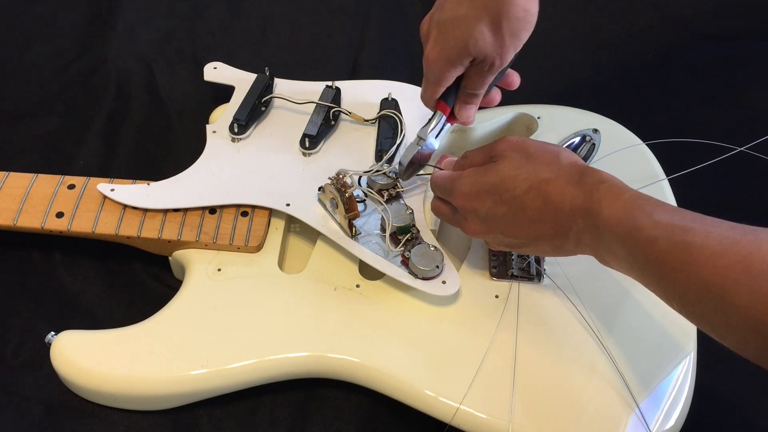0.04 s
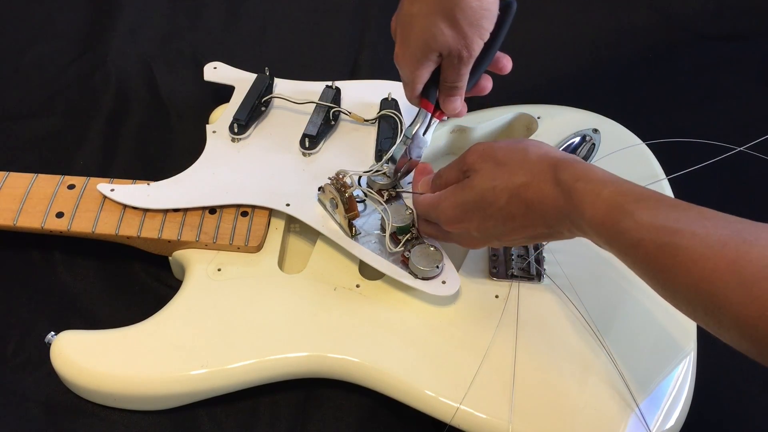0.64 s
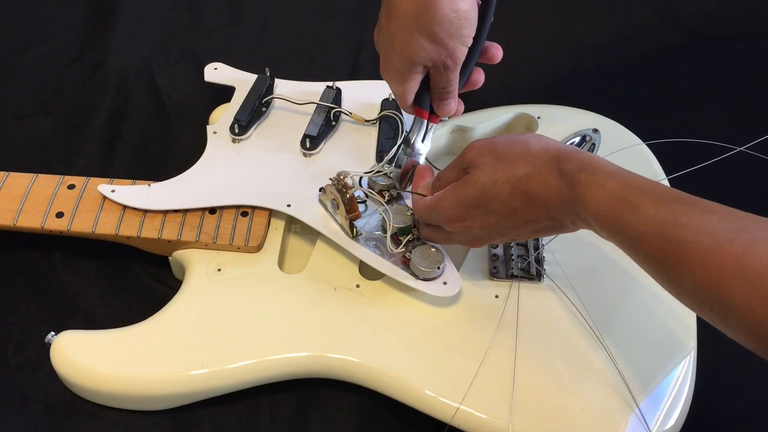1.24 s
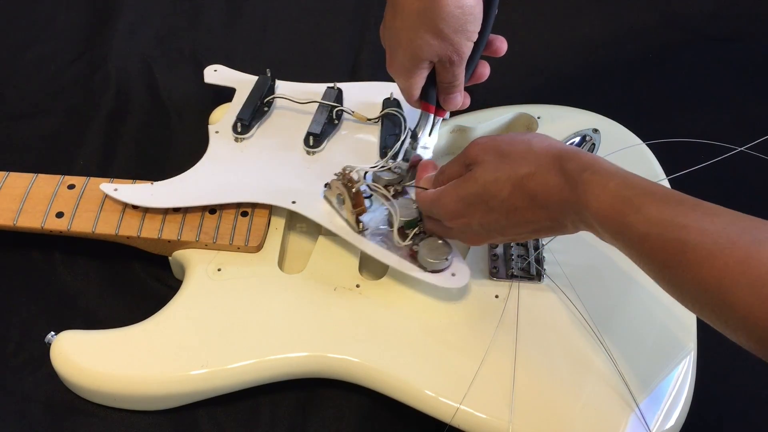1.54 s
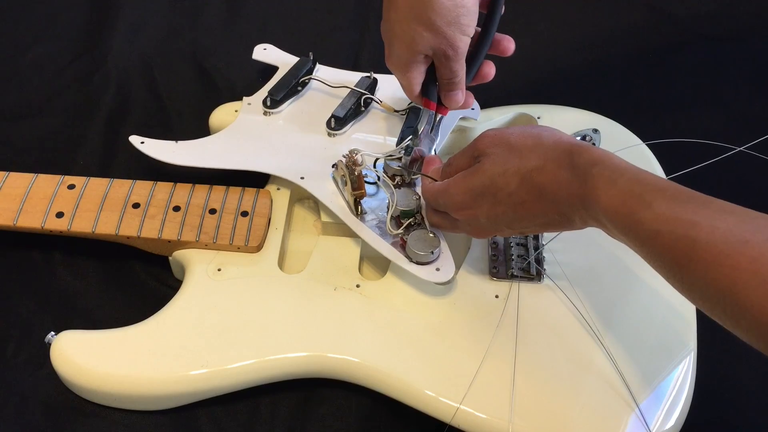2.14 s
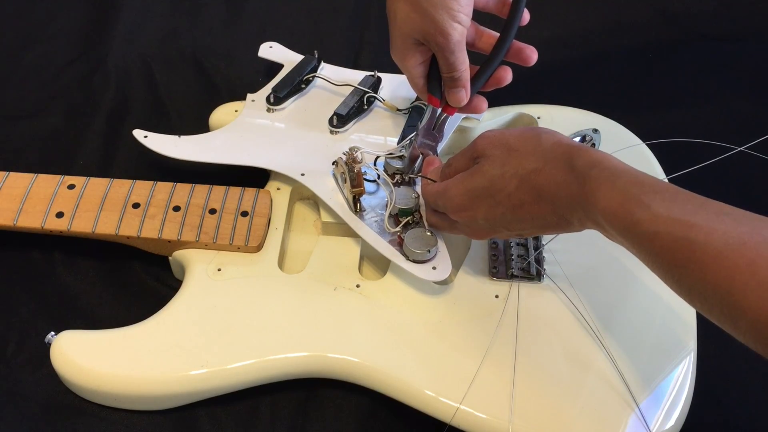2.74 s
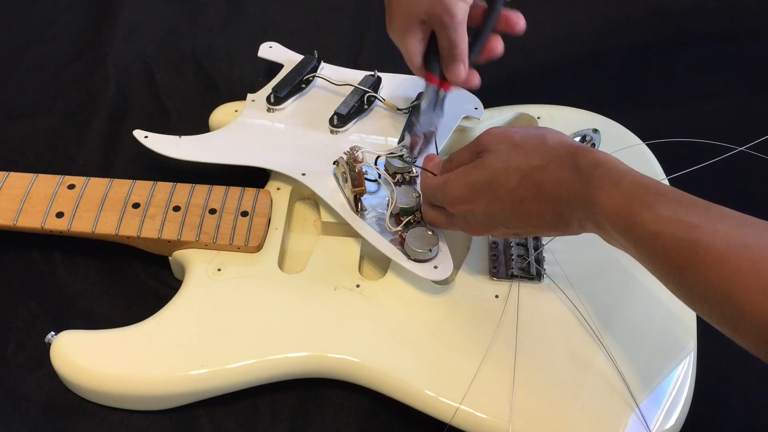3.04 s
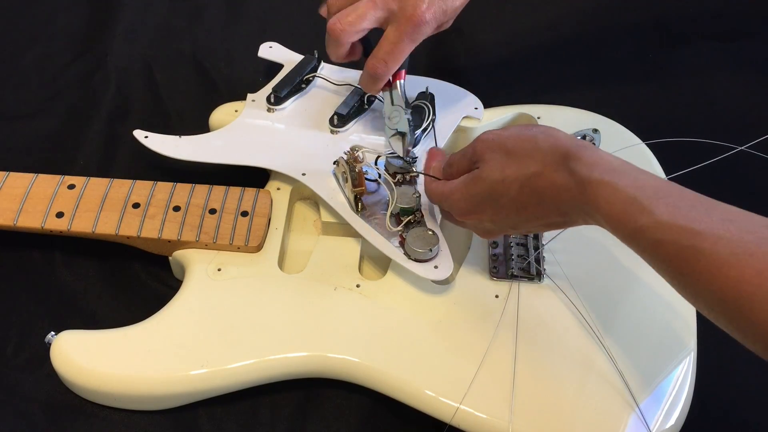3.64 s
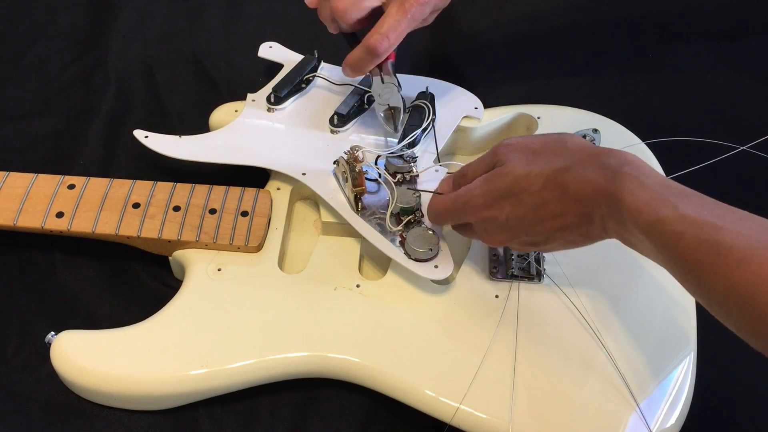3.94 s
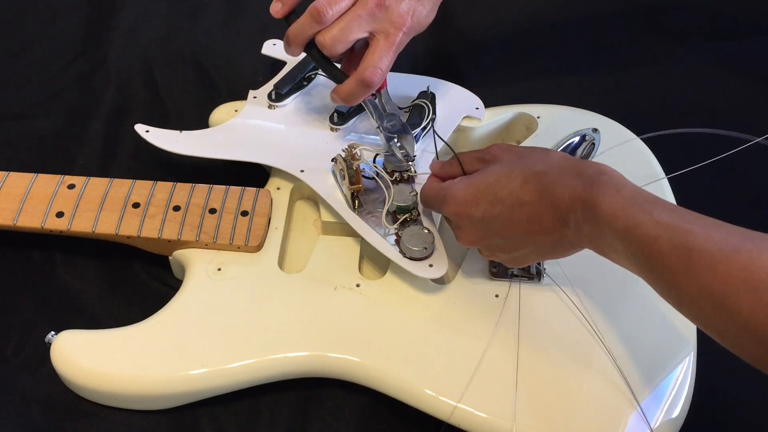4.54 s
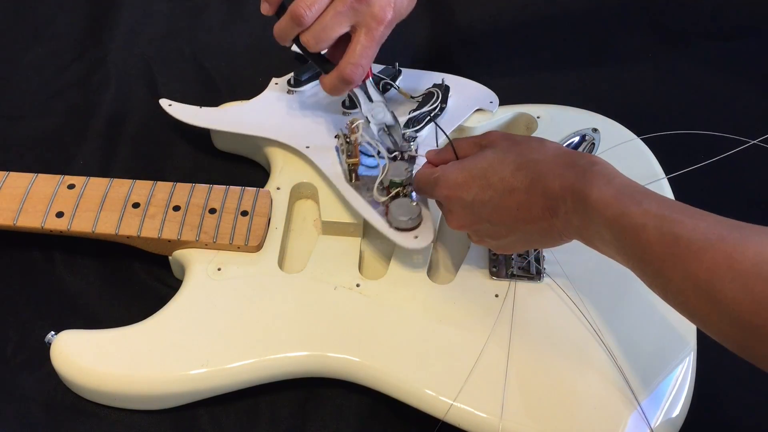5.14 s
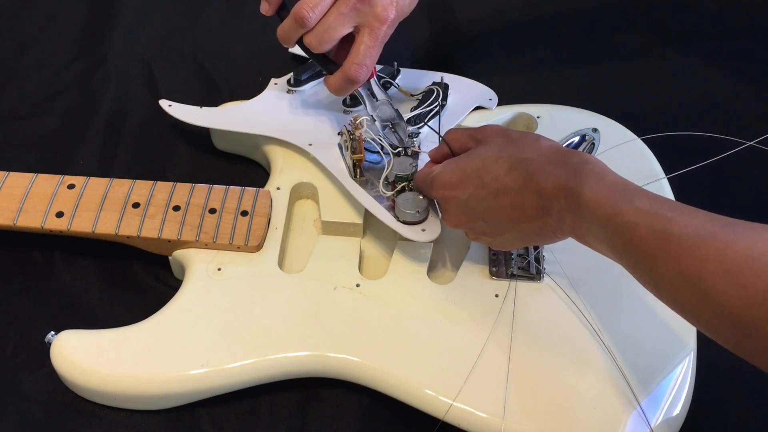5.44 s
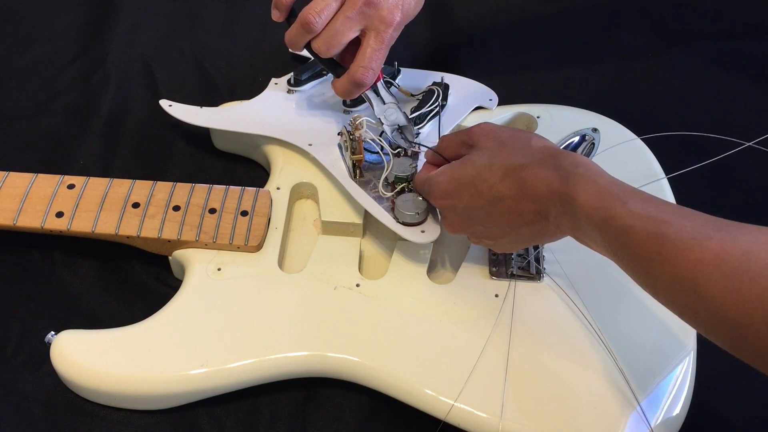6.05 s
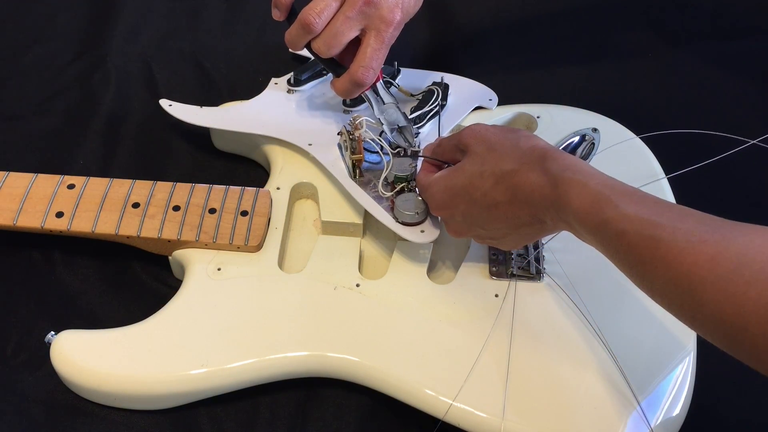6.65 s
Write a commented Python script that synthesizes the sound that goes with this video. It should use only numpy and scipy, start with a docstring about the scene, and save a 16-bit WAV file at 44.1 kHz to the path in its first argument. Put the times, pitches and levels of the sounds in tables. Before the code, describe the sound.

Steel pliers tick faintly on small metal parts, and wire gives tiny squeaks in their grip. A loose plastic plate then knocks and rubs on a wooden guitar body, leaving a faint metallic ring and a soft low boom. Sparse clicks and scrapes follow, until plate and pliers clatter together, louder, before a few last ticks. A close microphone in a small, quiet room picks up low hum and hiss.

```python
"""Pliers on the wiring under a loose electric-guitar pickguard; one close microphone, small quiet room.
First the steel jaws tick on pots and lugs, and wire squeaks in their grip. From 1.6 s the plastic plate
knocks and rubs on the wooden body, and a jolt sets the metalwork ringing and the bench booming faintly.
Sparse clicks and scrapes follow. Near 5 s plate and pliers clatter together with a second jolt,
then a few last ticks. A faint low hum and microphone hiss lie underneath throughout."""
import sys
import numpy as np
from scipy import signal
from scipy.fft import rfft, irfft, next_fast_len
from scipy.io import wavfile
from scipy.ndimage import uniform_filter1d

SR = 44100
rng = np.random.default_rng(int(sys.argv[2]) if len(sys.argv) > 2 else 0)


def pcm_store(signal):
    """Save signal as 16-bit PCM."""
    levels = np.round(np.clip(np.atleast_2d(signal), -1, 1) * 32767)
    wavfile.write(sys.argv[1], SR, levels.astype(np.int16).T)


N = 298996

# Modes of the pickguard with its pots and pickups: f/Hz, level/dB, t60/s
PLATE_MODES = [(265, -12.5, 0.17), (311.4, -4, 0.13), (432.3, -9.5, 0.12), (495.5, -3, 0.1),
               (563.7, -3, 0.1), (657.8, -2, 0.13), (731, -20, 0.2), (916, -1.5, 0.027), (1052, -1, 0.06),
               (1083, 0, 0.068), (1305, -11.5, 0.07), (1517, -1, 0.032), (1605, -4.5, 0.029),
               (1737, -5, 0.033), (2030, -34, 0.018), (2530, -6.5, 0.024), (2815, -21, 0.057)]
# Spectrum of the dull crack of plastic on wood: f/Hz, level/dB
PLATE_CRACK = [(100, -21), (200, -9), (290, 1.5), (680, 7.5), (810, -7), (1000, 3), (1300, -19), (1700, -5),
               (2100, -5.5), (2600, 1), (3800, -12), (8000, -0.5), (15000, -11)]
# Plate against body: t/s, contact/s, ring of the touching spot f/Hz, lowest free vibration f/Hz,
# level/dB, strongest f/Hz, treble roll-off/(dB per octave)
PLATE_KNOCKS = [(1.612, 0.0035, 706, 200, -52.5, 850, 10.5), (1.6955, .002, 650, 190, -43, 600, 8.5),
                (1.7614, 0.00033, 570, 170, -30, 650, 13), (1.861, 0.002, 499, 170, -27.5, 720, 11.5),
                (1.9881, 0.0011, 1064, 180, -35, 900, 11.5), (2.293, 0.00034, 1950, 200, -44, 1700, 17.5),
                (2.4229, .0007, 1044, 200, -44.5, 1150, 15), (2.6468, .013, 690, 220, -48.5, 1000, 7.5),
                (4.8268, .0007, 960, 220, -42.5, 1000, 10.5), (4.9803, 0.0012, 1370, 300, -37.5, 1400, 2),
                (4.9865, 0.00043, 496, 330, -34, 850, 6.5), (4.996, .0009, 545, 350, -35.5, 450, 9),
                (5.031, 0.002, 500, 520, -35.5, 470, 7.5), (5.3079, 0.0054, 1210, 300, -39.5, 1050, 17)]

def pickguard():
    """The plate drops on the body: a soft crack and a hollow ring; a slower contact smears the attack."""
    out, t = np.zeros(N), np.arange(SR // 2) / SR
    for s, contact, spot_hz, lowest_hz, db, centre_hz, roll_off in PLATE_KNOCKS:
        crack = amp(11 - 60 * t / (0.0096 + 2 * contact)) * shaped_noise(PLATE_CRACK, len(t))
        spot = amp(5.5 - 60 * t * spot_hz / 26) * np.sin(2 * np.pi * spot_hz * t)  # dies in 26 cycles
        attack = 1 - np.exp(-t / contact)
        hit = (ring(PLATE_MODES, t, spread_db=2, detune=0.0026) + spot + crack) * attack
        hit = coloured(no_bass(hit, lowest_hz), db, centre_hz, roll_off, bass_slope=0.31 * roll_off)
        add(out, s, in_room(hit, wet_db=-12))
    return out


# Modes of the pliers gripping a part, damped by the hand: f/Hz, level/dB, t60/s
STEEL_MODES = [(606, -3.5, 0.041), (911, -17.5, 0.056), (1120, -3.5, 0.032), (1350, -2, 0.017),
               (1670, -5, 0.025), (1850, 0, 0.011), (2006, -7.5, 0.021), (2200, 2, 0.01),
               (2730, 0.5, 0.0091), (2947, -6.5, 0.025), (4070, -15, 0.024), (4450, -24, .018),
               (5470, -6, 0.012), (5700, -9, 0.0058), (7200, -12, 0.0069), (8480, 5.5, 0.0046)]
# Jaws on metal parts: t/s, contact/s, ring of the part f/Hz, top of the crack f/Hz,
# level/dB, strongest f/Hz, treble roll-off/(dB per octave)
JAW_CLICKS = [(.265, 0.0025, 1480, 5800, -56.5, 1310, 8), (.302, .003, 2750, 6000, -65, 1400, 3),
              (.497, 0.0044, 3200, 12000, -55.5, 2800, 7), (.65, 0.0019, 1200, 9000, -67.5, 900, 5.5),
              (1.2637, .0006, 1980, 11000, -50, 1850, 9.5), (1.468, .002, 1870, 6100, -70, 1700, 12),
              (1.629, 0.00053, 2940, 11800, -49, 1150, 3.5), (3.118, 0.0024, 8160, 9000, -71, 1780, 0.5),
              (3.4737, 0.00019, 5140, 10000, -51, 7050, -8), (3.479, 0.00081, 1370, 9000, -61.5, 1800, 2),
              (4.1737, 0.00029, 1920, 8000, -50, 1950, 12.5), (4.7213, 0.0039, 1140, 9000, -67, 1300, 5),
              (4.774, .0009, 2080, 6000, -68.5, 2000, 9), (4.982, 0.00022, 2700, 14600, -32, 2600, 5.5),
              (5.0402, 0.0035, 908, 8000, -41, 750, 5), (5.049, 0.00055, 5430, 6500, -31.5, 1700, 3),
              (5.0515, 0.00046, 2000, 9000, -28.5, 1850, 13.5), (5.084, 0.0037, 1720, 7000, -47, 1600, 16),
              (5.142, .003, 2100, 6000, -53, 1980, 16), (5.186, 0.0025, 1080, 6100, -45.5, 1370, 11),
              (5.309, .0013, 4050, 8000, -51.5, 1740, 8), (5.441, .005, 2090, 6000, -70, 2200, 8),
              (5.669, 0.0019, 1110, 11100, -63, 795, 2)]

def pliers():
    """Steel meets steel: a sharp crack, or a short skid, and a ring that the hand stops at once."""
    out, t = np.zeros(N), np.arange(SR // 2) / SR
    for s, contact, part_hz, top_hz, db, centre_hz, roll_off in JAW_CLICKS:
        white = rng.standard_normal(len(t))
        noise = filtered(white, lambda hz: 1 / np.sqrt(1 + (hz / top_hz) ** 24) + amp(-21))
        crack = amp(9 - 60 * t / (0.0078 + 4 * contact)) * noise
        t60 = 20 / part_hz + 2 * contact  # smaller, higher parts die sooner
        part = amp(-9 - 60 * t / t60) / np.sqrt(t60) * np.sin(2 * np.pi * part_hz * t)
        attack = 1 - np.exp(-(t / contact) ** 2)
        hit = (ring(STEEL_MODES, t, spread_db=6, detune=0.002) + part + crack) * attack
        hit = coloured(no_bass(hit, hz=296), db, centre_hz, roll_off, bass_slope=8)
        add(out, s, in_room(hit, wet_db=-12))
    return out


# Slides of the plate: t/s, length/s, level/dB
PLATE_RUBS = [(1.618, 0.098, -54), (1.785, 0.026, -45), (1.85, 0.046, -52)]

def plate_rubs():
    """Plastic slides on the wooden body with a soft, gritty rub."""
    return friction(PLATE_RUBS, PLATE_MODES, slips_per_s=580, grit_db=12, soft_hz=2000)


# Slides of the jaws: t/s, length/s, level/dB
JAW_SCRAPES = [(1.155, 0.048, -62.5), (1.627, 0.038, -55.5), (4.18, 0.021, -58.5), (4.34, 0.084, -70.5),
               (4.995, .02, -45), (5.022, 0.012, -44.5), (5.085, 0.033, -51), (5.16, 0.061, -57.5),
               (5.308, 0.0063, -60)]

def jaw_scrapes():
    """The jaws drag along wire and lugs, and the steel rings."""
    return friction(JAW_SCRAPES, STEEL_MODES, slips_per_s=790, grit_db=-15, soft_hz=4200)


# Slips of the wire: t/s, f/Hz, level/dB, length/s
WIRE_SQUEAKS = [(0.494, 1420, -52.5, 0.018), (1.142, 1377, -48, 0.019), (1.171, 1470, -58, 0.012),
                (1.192, 1445, -55, 0.015), (1.209, 1460, -55, .014), (3.748, 1106, -59, 0.017)]

def wire_squeaks():
    """Wire sticks and slips in the jaws in short, slightly unsteady chirps."""
    out, t = np.zeros(N), np.arange(SR // 10) / SR
    for s, hz, db, length in WIRE_SQUEAKS:
        drift = 0.012 * unit(uniform_filter1d(rng.standard_normal(len(t)), size=90))
        phase = 2 * np.pi * np.cumsum(hz * (1 + drift)) / SR
        swell = np.sin(np.pi * np.minimum(t / length, 1) ** 1.14)
        add(out, s, amp(db) * swell * (np.sin(phase) + amp(-14) * np.sin(2 * phase)))
    return in_room(out, wet_db=-7.5)


# Long, faint modes of the guitar's metalwork: f/Hz, level/dB, t60/s
METALWORK_MODES = [(556, 4, 0.49), (653, -2.5, 1.25), (672, -9, 1.4)]
# Jolts that shake the whole guitar: t/s, boom f/Hz, boom level/dB, metalwork level/dB
JOLTS = [(1.78, 85.8, -48.5, -50.5), (5.021, 60.4, -41.5, -53)]

def metalwork():
    """A jolt leaves the guitar's metalwork ringing in sympathy."""
    out, t = np.zeros(N), np.arange(SR) / SR
    attack = 1 - np.exp(-t / 0.012)
    for s, _, _, db in JOLTS:
        add(out, s, amp(db) * attack * ring(METALWORK_MODES, t, spread_db=3, detune=0.0017))
    return out


def bench():
    """A jolt also sets the bench booming faintly."""
    out, t = np.zeros(N), np.arange(SR) / SR
    attack = 1 - np.exp(-(t / 0.06) ** 2)
    for s, hz, db, _ in JOLTS:
        add(out, s, amp(db - 60 * t / 0.71) * attack * np.sin(2 * np.pi * hz * t))
    return out


# Spectrum of room air and microphone hiss: f/Hz, relative level/dB
AIR_SPECTRUM = [(20, -18), (40, -10), (62, 1.5), (110, -1.5), (180, -3.5), (330, -7.5), (500, -12.5),
                (900, -14.5), (2000, -16.5), (4000, -19), (6200, -21), (9000, -23.5), (15500, -28)]

def room_tone(air_db, hum_hz, hum_width_hz, hum_db):
    """Even hiss and a low, wavering room hum."""
    air = shaped_noise(AIR_SPECTRUM, N)
    hum = filtered(rng.standard_normal(N), lambda hz: 1 / (1 + ((hz - hum_hz) / hum_width_hz) ** 2))
    return amp(air_db) * air + amp(hum_db) * unit(hum)


# Decay of the small room: f/Hz, t60/s
ROOM_DECAY = [(150, 0.14), (600, 0.24), (2000, 0.23), (6000, 0.15), (15000, 0.17)]

def in_room(x, wet_db):
    """The direct sound at the microphone, plus a diffuse tail that builds up as the walls answer."""
    hz, t, spectra = signal.stft(rng.standard_normal(SR // 2), SR, nperseg=256)
    decay = amp(-60 * t / along(ROOM_DECAY, hz)[:, None])
    tail = signal.istft(spectra * decay, SR, nperseg=256)[1]
    tail *= 1 - np.exp(-(np.arange(len(tail)) / SR / 0.005) ** 2)
    return x + amp(wet_db) * signal.fftconvolve(x, tail / np.linalg.norm(tail))[:len(x)]


def ring(modes, t, spread_db, detune):
    """Decaying modes; grip and point of contact shift their strength and pitch."""
    hz, db, t60 = np.transpose(modes)[:, :, None]
    level, pitch, phase = rng.standard_normal((3, len(modes), 1))
    decay = amp(db + spread_db * level - 60 * t / t60)
    return np.sum(decay * np.sin(2 * np.pi * (hz * (1 + detune * pitch) * t + phase)), 0)


def friction(slides, modes, slips_per_s, grit_db, soft_hz):
    """Tiny slips of uneven size excite an object's modes; their soft edges spare the highest ones."""
    t = np.arange(SR // 5) / SR
    slips = (rng.random(N) < slips_per_s / SR) * rng.standard_normal(N)
    grit = amp(grit_db - 60 * t / 0.0048) * rng.standard_normal(len(t))
    grain = ring(modes, t, spread_db=1, detune=0.003) + grit
    rubbed = signal.fftconvolve(slips, grain)[:N]
    softened = filtered(rubbed, lambda hz: 1 / np.sqrt(1 + (hz / soft_hz) ** 4))
    return strokes(slides) * unit(softened)


def strokes(slides, rise_db_per_s=797, fall_db_per_s=330):
    """Gain of a series of slides: each catches quickly, holds and dies away more slowly."""
    t, gain = np.arange(N) / SR, np.zeros(N)
    for s, length, db in slides:
        fade_db = rise_db_per_s * np.maximum(s - t, 0) + fall_db_per_s * np.maximum(t - s - length, 0)
        gain = np.maximum(gain, amp(db - np.minimum(fade_db, 100)))
    return gain


# Edges of the five bands that colour a hit: f/Hz
BAND_EDGES = [200, 750, 1300, 2300, 4500, 16000]

def coloured(x, db, centre_hz, treble_slope, bass_slope):
    """Shape a hit so its first 15 ms are strongest at centre_hz; slopes to each side in dB per octave."""
    size, head = 32768, round(0.015 * SR)
    hz, edges = np.fft.rfftfreq(size, 1 / SR), np.array(BAND_EDGES)
    centres = np.sqrt(edges[1:] * edges[:-1])
    octaves = np.log2(centres / centre_hz)
    band_db = db + bass_slope * np.minimum(octaves, 0) - treble_slope * np.maximum(octaves, 0)
    for _ in range(3):
        power = np.histogram(hz, edges, weights=abs(rfft(x[:head], size)) ** 2)[0] * 2 / (size * head)
        gain_db = band_db - 10 * np.log10(power + 1e-30)
        gain = amp(along(np.c_[centres, gain_db], hz))
        cepstrum = irfft(np.log(gain))
        cepstrum[1:size // 2] *= 2  # minimum phase: nothing sounds ahead of the hit
        cepstrum[size // 2 + 1:] = 0
        x = irfft(rfft(x, size) * np.exp(rfft(cepstrum)))[:len(x)]
    return x


def no_bass(x, hz):
    """Small parts radiate no bass."""
    return signal.sosfilt(signal.butter(3, hz, "high", fs=SR, output="sos"), x)


def shaped_noise(spectrum, n):
    """Noise of rms 1 that follows (f/Hz, level/dB) points."""
    return unit(filtered(rng.standard_normal(n), lambda hz: amp(along(spectrum, hz))))


def filtered(x, response):
    """Filter by a gain that depends on frequency."""
    size = next_fast_len(len(x) + 8192)
    return irfft(rfft(x, size) * response(np.fft.rfftfreq(size, 1 / SR)), size)[:len(x)]


def along(points, hz):
    """Read (f/Hz, value) points on a log axis."""
    f, values = np.transpose(points)
    return np.interp(np.log(hz + 1), np.log(f + 1), values)


def amp(db):
    """Decibels to gain."""
    return 10 ** (np.asarray(db) / 20)


def unit(x):
    """Scale to rms 1."""
    return x / np.sqrt(np.mean(x ** 2) + 1e-30)


def add(track, s, sound):
    """Mix a sound in at time s."""
    part = track[round(s * SR):][:len(sound)]
    part += sound[:len(part)]


def scene():
    """The handwork, heard from beside the bench over the room tone, in mono."""
    knocks_and_slides = pickguard() + plate_rubs() + jaw_scrapes()
    floor = room_tone(air_db=-63.83, hum_hz=82.2, hum_width_hz=2.9, hum_db=-72)
    return (knocks_and_slides + metalwork() + pliers() + wire_squeaks() + bench() + floor)[None]


# Notches of the microphone port: f/Hz, width/Hz, level/dB
PORT_NOTCHES = [(4900, 240, -3), (7800, 550, -2), (10500, 380, -5)]
BAND_LIMIT_HZ = 15950

def record(dry):
    """The microphone port notches the treble; nothing passes above the band limit."""
    def response(f):
        notch_db = sum(db * np.exp(-((f - hz) / width) ** 2) for hz, width, db in PORT_NOTCHES)
        return amp(notch_db) * (f < BAND_LIMIT_HZ)
    return filtered(dry[0], response)[None]


dry = scene()
out = record(dry)
pcm_store(out)
```